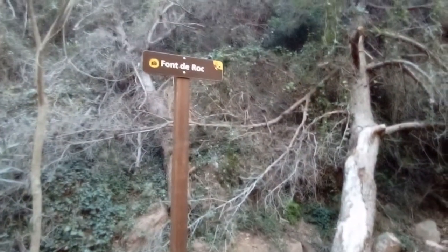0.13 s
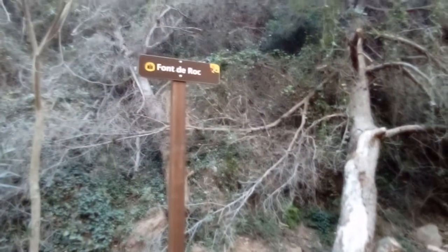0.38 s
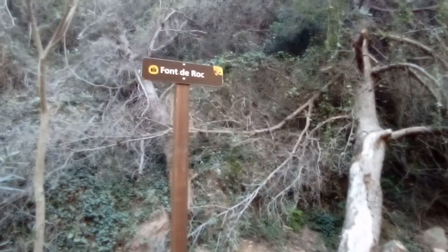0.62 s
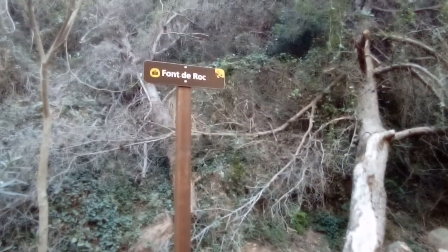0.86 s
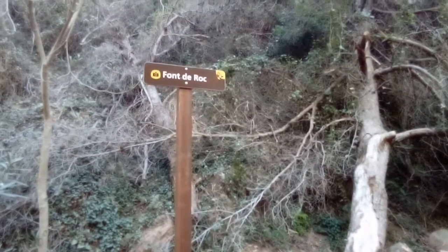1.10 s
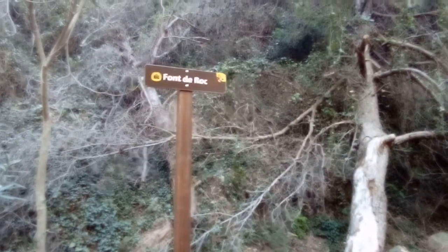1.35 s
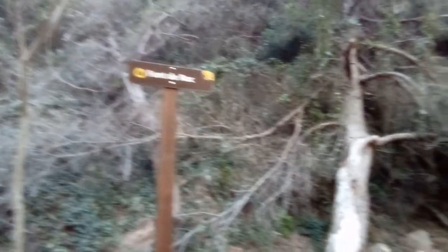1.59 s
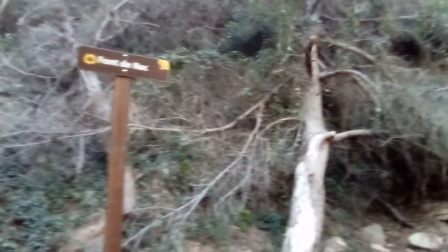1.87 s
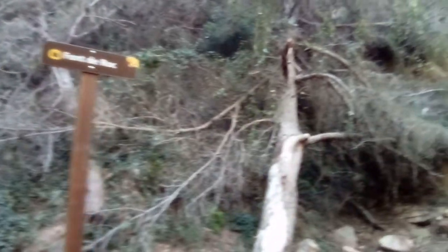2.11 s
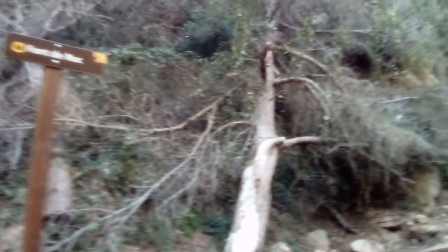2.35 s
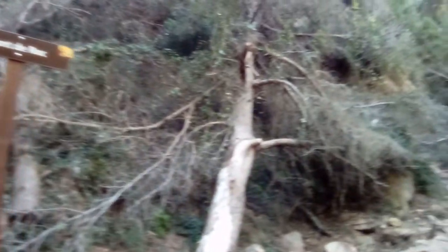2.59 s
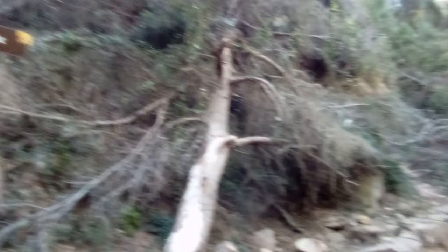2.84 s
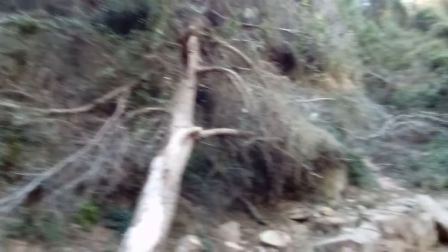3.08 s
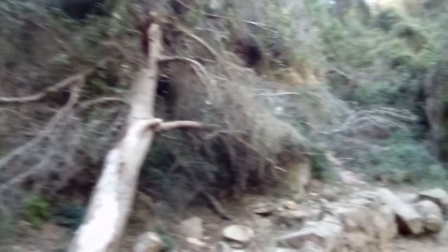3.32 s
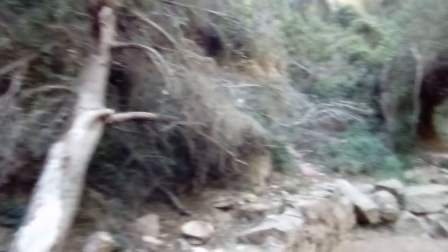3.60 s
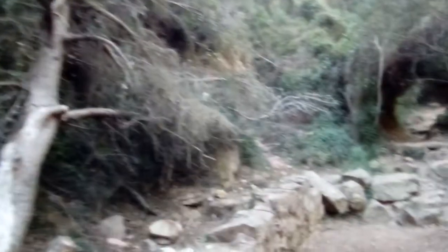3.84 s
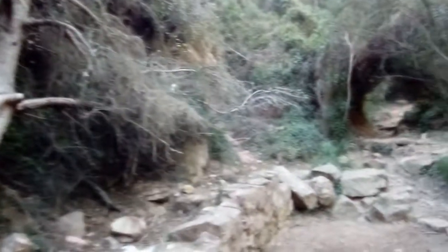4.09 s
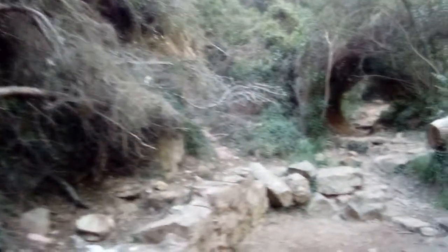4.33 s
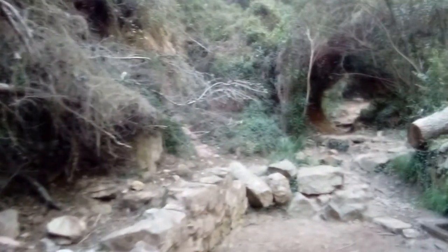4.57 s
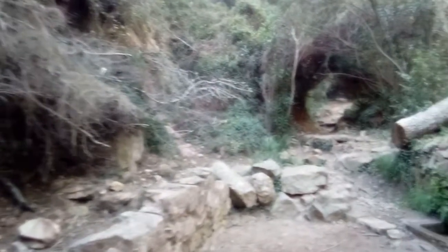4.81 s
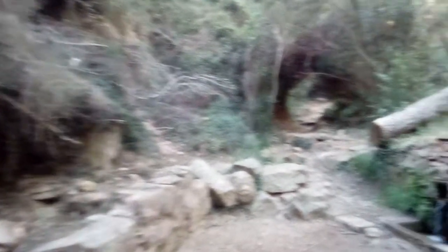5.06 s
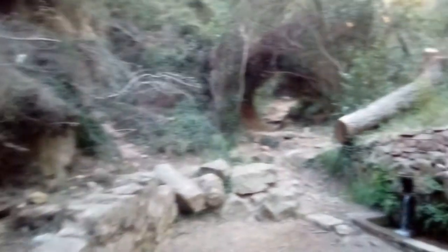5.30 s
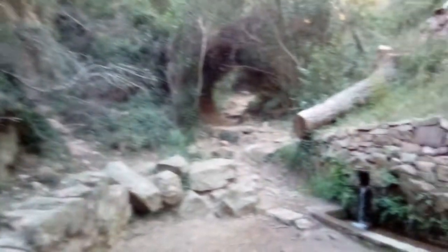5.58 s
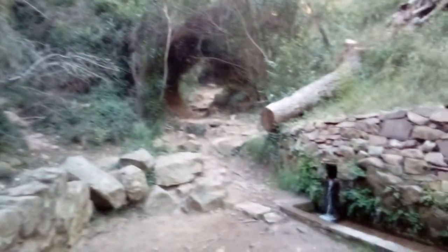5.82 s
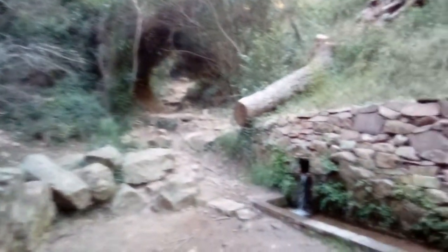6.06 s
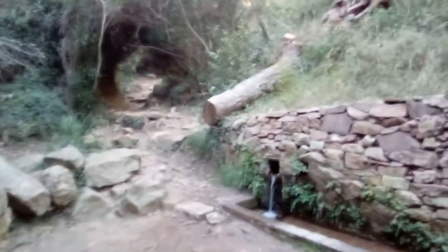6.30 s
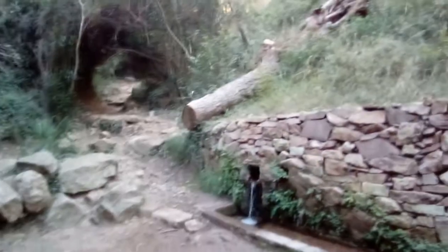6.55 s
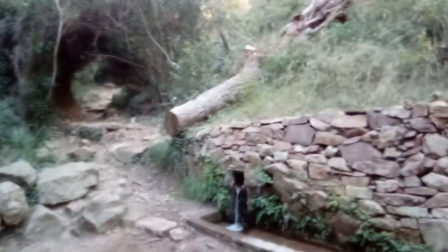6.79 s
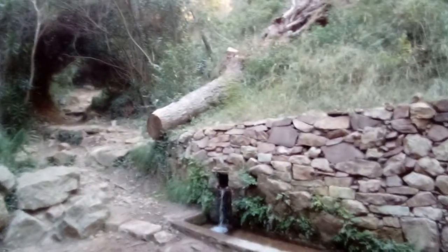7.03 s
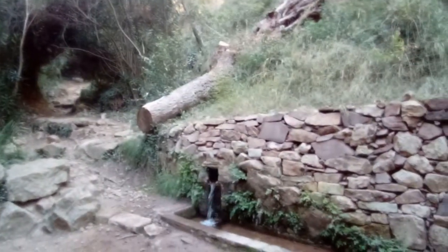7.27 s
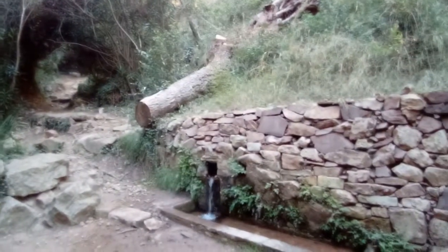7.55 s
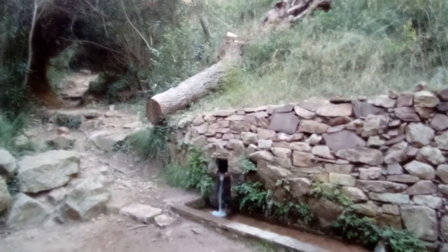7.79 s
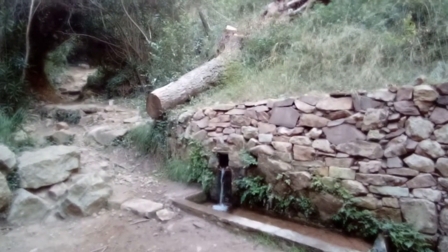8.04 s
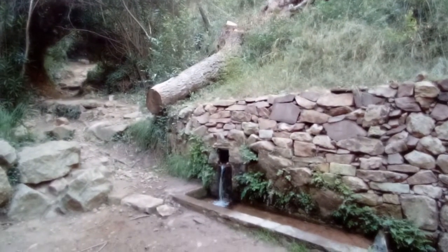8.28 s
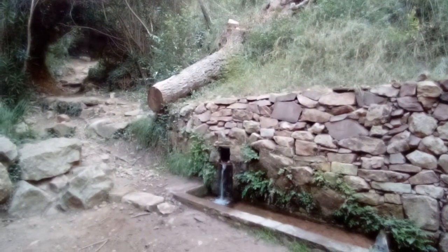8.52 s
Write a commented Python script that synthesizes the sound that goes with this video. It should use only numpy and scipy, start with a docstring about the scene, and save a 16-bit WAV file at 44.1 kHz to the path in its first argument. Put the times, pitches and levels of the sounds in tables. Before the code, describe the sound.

A thin stream of spring water falls without pause into a narrow stone trough outdoors. Splashing spray carries hollow gulps, gurgles and small pops. Shoes scuff dirt near the start, around three to four seconds and at six and a half; a few dry snaps occur. The hand-held stereo microphone slowly turns to the water, so the splash changes colour and bubbles become clearer, with resonant slaps late on.

```python
"""Splashing, gulping water at once: a spring pours from a pipe in a stone wall into a narrow outdoor trough.
Splash is coloured noise in swelling bands; gulps, bloops and pops are rising sines; gurgle is clumped ringing.
Slaps are noise rushes through the resonances of the hollow under the pipe.
Feet shift on the dirt path: scuffs are band-passed grit noise, snaps are short modes.
A hand-held microphone pair turns slowly towards the water, changing colour and lag."""
import sys
import numpy as np
from scipy import signal
from scipy.fft import rfft, irfft
from scipy.io import wavfile
from scipy.ndimage import uniform_filter1d, map_coordinates

SR = 44100
rng = np.random.default_rng(int(sys.argv[2]) if len(sys.argv) > 2 else 0)


def pcm_store(signal):
    """Save signal as 16-bit PCM."""
    levels = np.round(np.clip(np.atleast_2d(signal), -1, 1) * 32767)
    wavfile.write(sys.argv[1], SR, levels.astype(np.int16).T)


def magnitude_from_level(level_db):
    """Linear magnitude for a level in decibels (20 dB per decade)."""
    exponent = np.asarray(level_db, float) / 20
    return 10 ** exponent


N = 381456


def rms_one(x):
    """Scale to rms 1 over all channels."""
    return x / np.sqrt(np.mean(x ** 2) + 1e-20)


def at_hz(points, hz, column=1):
    """Table column interpolated over log frequency."""
    points = np.array(points)
    return np.interp(np.log(np.maximum(hz, 1)), np.log(points[:, 0]), points[:, column])


def drift(rate_hz):
    """Slow chance of rms 1: noise at every 20th sample through a double one-pole low-pass."""
    r = np.exp(-40 * np.pi * rate_hz / SR)
    noise = rng.standard_normal(N // 20 + 2002)
    slow = signal.lfilter([1], [1, -2 * r, r * r], noise)[2000:]
    return np.interp(np.arange(N) / 20, np.arange(len(slow)), rms_one(slow))


def grains(per_s, spread_db):
    """Random clicks, a few of them much larger than the rest."""
    sizes = magnitude_from_level(spread_db * np.minimum(rng.exponential(1, N), 4))
    return sizes * (rng.random(N) < per_s / SR)


def colour(x, db_by_hz):
    """Causal filter with the given gain on an even grid from 0 to SR / 2 (folded cepstrum)."""
    cepstrum = irfft(db_by_hz * np.log(10) / 20)
    half = len(cepstrum) // 2
    cepstrum[1:half] *= 2
    cepstrum[half + 1:] = 0
    return signal.oaconvolve(x, irfft(np.exp(rfft(cepstrum)))[:half])[:N]


def blend(x, position, tables):
    """Three colourings of one sound, at positions 0, 1 and 2, fade into each other."""
    position = np.clip(position, 0, 2)
    return sum(np.clip(1 - abs(position - p), 0, 1) * colour(x, db) for p, db in enumerate(tables))


def add(out, start_s, sound):
    """Mix a sound in, cut at the end of the scene."""
    at = round(start_s * SR)
    out[..., at:at + sound.shape[-1]] += sound[..., :N - at]


def late_left(x, lag_ms):
    """The common sound reaches the left microphone later."""
    left = map_coordinates(x, [np.arange(N) - lag_ms * SR / 1000], order=3)
    return np.array([left, x])


def bubble(db, hz, t60_s, rise_octaves, swell_cycles):
    """A sine that swells, climbs in pitch over the first third of its t60 and dies."""
    t = np.arange(round(t60_s * SR)) / SR
    phase = 2 * np.pi * np.cumsum(hz * 2 ** (rise_octaves * np.minimum(3 * t / t60_s, 1))) / SR
    shape = (1 - np.exp(-t * hz / swell_cycles)) * magnitude_from_level(-60 * t / t60_s)
    return magnitude_from_level(db) * np.sin(phase) * shape / shape.max()


def ring(clicks, hz, t60_s):
    """A unit click sets a decaying sine of height 1 ringing."""
    r, w = magnitude_from_level(-60 / (t60_s * SR)), 2 * np.pi * hz / SR
    return signal.lfilter([0, np.sin(w)], [1, -2 * r * np.cos(w), r * r], clicks + 1e-18)


def droplets(low_hz, high_hz, per_s, cycles, count):
    """Bubbles born in clumps, dealt to pitches spread evenly in Hz; higher ones die sooner; rms 1."""
    born = grains(per_s * magnitude_from_level(4.7 * drift(11.0)), spread_db=8.5)
    dealt = rng.integers(0, count, N)
    out = 0
    for k, hz in enumerate(np.linspace(low_hz, high_hz, count)):
        out = out + ring(born * (dealt == k), hz, cycles / hz ** 0.51) * hz ** 0.87
    return rms_one(out)


def slugs(hz):
    """Each loud bubble comes with a short burst of spray around its own pitch."""
    s, db, pitch_hz = np.transpose(LOUD_POPS)[:3]
    hits = np.zeros(N)
    nearness = np.exp(-(np.log2(pitch_hz / hz) / .75) ** 2)
    hits[np.round(s * SR).astype(int)] = magnitude_from_level(db + 30) * nearness
    fall = magnitude_from_level(-60 / (0.054 * SR))
    return uniform_filter1d(signal.lfilter([1], [1, -fall], hits), round(0.0017 * SR))


def spray(bubbling_db):
    """Three flat-spectrum splashes (common, left only, right only) that swell together."""
    edges_hz = np.minimum(30 * 2 ** np.arange(0, 9.6, .5), 19000)
    white, out = rng.standard_normal((2, 3, N)), 0
    near, flow = drift(25.0), drift(32.0)
    flow -= uniform_filter1d(flow, round(.15 * SR))  # the mean flow is steady
    spit_fall = magnitude_from_level(-60 / (0.0048 * SR))
    spits = signal.lfilter([1], [1, -spit_fall], grains(per_s=70.0, spread_db=3.5))  # brief wide spatters
    for k, (low, high) in enumerate(zip(edges_hz, edges_hz[1:])):
        near = 0.85 * near + 0.6 * drift(36.0)  # neighbouring bands swell partly together
        band_pass = signal.butter(2, [low, high], "band", fs=SR, output="sos")
        band = signal.sosfilt(band_pass, white[k % 2])
        spit_share = .33 * min(low / 1000.0, 1) * (2.4 if low > 10500 else 1)  # finest spray spits hardest
        bursts = 1 + slugs(np.sqrt(low * high)) + spit_share * spits
        swell_db = 0.5 * flow + 1.28 * near + 2.44 * drift(98.0) + 1.44 * drift(2.37)
        out = out + rms_one(band * magnitude_from_level(swell_db) * bursts) * np.sqrt(high - low)  # 0 dB per Hz
    born_per_s = 1500. * (1 + 2.7 * slugs(1600.))  # a slug leaves a cluster of bubbles behind
    out[0] += magnitude_from_level(37 + bubbling_db) * droplets(800., 7000., per_s=born_per_s, cycles=2.2, count=40)
    return out


# Splash spectrum at each microphone before hollow lifts and final gain.
# Each row: frequency in Hz, level in dB per Hz facing away, the same sideways, the same facing the water.
LEFT_SPLASH = [(40, -103, -104, -103), (80, -99, -98, -97), (130, -93, -91, -90), (360, -80, -84, -86),
               (760, -93, -86, -91), (1150, -88, -82, -82), (2000, -82, -80, -77), (3000, -85, -85, -82),
               (4300, -81, -83, -86), (5300, -86, -90, -88), (6600, -91, -94, -91.6),
               (7600, -102, -104, -103), (9300, -109, -103, -101), (14000, -113, -109, -108),
               (14700, -104, -97, -92), (15500, -103, -97, -91)]
RIGHT_SPLASH = [(40, -95, -94, -93), (80, -90, -89, -88), (130, -91, -89, -90), (360, -81, -84, -86),
                (760, -95, -88, -92), (1150, -89, -84, -83), (2000, -84, -80, -75), (3000, -82, -78, -82),
                (4400, -75, -78.6, -74), (5300, -84, -79, -72), (6600, -82, -75, -80),
                (7600, -90, -86, -87), (9300, -100, -93.5, -96), (13900, -102, -92, -99),
                (14650, -88, -79, -81), (15500, -87, -79, -81)]
# Resonances of hollow and trough. Each row: frequency in Hz, width in Hz, lift in dB at opening 0, at 1, at 2.
HOLLOW_MODES = [(250, 37, 9, 14.5, 12.5), (480, 44, -0.5, 2.8, 10), (996, 130, 5.5, 1.1, 7),
                (1250, 18, 0.5, 0.56, 4), (1410, 130, 11.5, 0.23, -3.5), (1500, 37, 2, 0.71, 9),
                (1762, 140, 8, 5.1, 3.5), (1860, 33, 1.5, 0.5, 2), (2037, 64, 0.5, 0.1, 3),
                (2227, 124, 8.5, 10.5, 4.5), (2450, 60, 7.5, 2.7, 9.5), (2640, 73, -7, 8.8, 4)]
# Likeness of the two channels. Each row: frequency in Hz, share of power common to both (held to .01-.99).
COMMON_SHARE = [(50, 0.25), (140, 0.098), (250, 0.74), (600, 0.37), (1200, 0.57), (2200, 0.36),
                (5000, 0.13), (9000, 0.0047)]


def splash(pose, lag_ms, opening):
    """The spray coloured by hollow, trough and the way each microphone points."""
    gain_db = 1.5
    common, *own = spray(bubbling_db=2 * pose)  # bubbles stand out once the trough is in view
    hz = np.linspace(0, SR / 2, 4097)
    share = np.clip(at_hz(COMMON_SHARE, hz), .01, .99)
    flat = late_left(colour(common, 10 * np.log10(share)), lag_ms)
    flat += [colour(x, 10 * np.log10(1 - share)) for x in own]
    lifts_db = [sum(row[2 + p] / (1 + (2 * (hz - row[0]) / row[1]) ** 2) for row in HOLLOW_MODES)
                for p in range(3)]
    out = []
    for x, table in zip(flat, (LEFT_SPLASH, RIGHT_SPLASH)):
        hollowed = blend(x, opening, lifts_db)
        out.append(blend(hollowed, pose, [at_hz(table, hz, column=1 + p) for p in range(3)]))
    return magnitude_from_level(gain_db) * np.array(out)


# Mid-sized bubbles churning in the trough. Each row: time in seconds, rms in dB before the low mix.
GURGLE_LEVEL = [(0, -53.5), (.55, -58.5), (1.0, -80), (1.9, -58), (2.75, -63.5), (3.9, -63), (4.25, -56),
                (5.0, -82), (6, -50.5), (6.4, -64), (7.1, -55.5), (7.6, -58), (8.65, -62)]


def gurgle():
    """Clumped mid-sized bubbles ring at fixed pitches under a moving level."""
    level_db = np.interp(np.arange(N) / SR, *np.transpose(GURGLE_LEVEL))
    return magnitude_from_level(level_db) * droplets(283.0, 680.0, per_s=410.0, cycles=1.0, count=14)


# Loudest air pockets under the stream. Each row: start in seconds, peak in dB before the low mix, pitch in Hz.
LOUD_GULPS = [(0.044, -37, 242), (0.609, -33, 258), (0.709, -29, 248.6), (0.946, -37.5, 239),
              (1.443, -38, 285), (1.657, -36.5, 250), (1.955, -39.5, 260), (2.041, -38.5, 270),
              (2.946, -36.5, 265), (3.02, -33.5, 305), (3.084, -35.5, 248), (4.314, -28, 242),
              (4.439, -39, 252), (4.877, -32, 231), (5.3, -39, 264), (5.396, -35, 250), (5.694, -33, 242),
              (5.842, -35, 260), (6.011, -30.5, 259.5), (6.166, -37.5, 265), (6.504, -33.5, 230),
              (6.66, -32, 231), (6.777, -27, 246), (7.195, -32.5, 228), (7.281, -36.5, 282),
              (8.244, -28, 242.5), (8.378, -32, 227)]


def gulps():
    """Air pockets ring near the lowest resonance; weaker ones come at random between the loud ones."""
    t60_at_250hz_s, t60_fall_power, shortest_s = 0.087, 3.1, 0.078  # larger, lower pockets ring longer
    out = np.zeros(N)
    for s, db, hz in LOUD_GULPS:
        t60_s = max(t60_at_250hz_s * (250 / hz) ** t60_fall_power, shortest_s)
        add(out, s, bubble(db, hz, t60_s, rise_octaves=0.098, swell_cycles=0.65))
        later, apart = rng.random(2)  # the pocket splits: a weaker one follows at another pitch
        second = bubble(db - 15.5, hz * (.92 + 0.232 * apart), 1.2 * t60_s, rise_octaves=0.12, swell_cycles=2.8)
        add(out, s + .02 + 0.0305 * later, second)
    for when, size, pitch, length in rng.random((420, 4)):
        db, hz, t60_s = -53 + 13 * size ** 4.0, 222 + 140 * pitch ** 1.8, 0.038 + 0.12 * length ** 2
        add(out, when * N / SR, bubble(db, hz, t60_s, rise_octaves=0.25 * pitch, swell_cycles=0.93))
    return out


# Soles scuffing and treading on dirt.
# Each row: start in seconds, rms in dB before shaping, length in seconds before the tail, bottom Hz, top Hz.
SOLE_SCUFFS = [(0.141, -46.5, 0.045, 250, 1020), (0.19, -31.5, 0.061, 158, 1190),
               (3.097, -62, 0.17, 30, 151), (3.159, -35, 0.047, 294, 910), (4.063, -47, 0.062, 300, 1060),
               (4.206, -48.5, 0.13, 252, 634), (4.303, -54, 0.073, 30.4, 150),
               (6.515, -38, 0.044, 272, 930)]


def crunch_shape(length_s):
    """Quick squared rise, hold, softer tail."""
    rise_share, tail_s = 0.39, 0.093
    t = np.arange(round((length_s + tail_s) * SR)) / SR
    rise = np.minimum(t / (rise_share * length_s), 1) ** 2
    return rise * magnitude_from_level(-60 * np.maximum(t - length_s, 0) / tail_s)


def scuffs():
    """Grit crunches in dull bursts: band-passed noise, uneven as stones give way one by one."""
    out = np.zeros((2, N))
    stones = uniform_filter1d(grains(per_s=320.0, spread_db=3.5), round(0.0022 * SR))
    grit = rng.standard_normal((3, N)) * (0.41 + stones * 30)
    grit = grit[0] + .5 * grit[1:]
    for s, db, length_s, low_hz, top_hz in SOLE_SCUFFS:
        at, shape = round(s * SR), crunch_shape(length_s)
        dull = signal.butter(3, [low_hz, top_hz], "band", fs=SR, output="sos")
        crunch = rms_one(signal.sosfilt(dull, grit[:, at:at + len(shape)]))
        side_gain = magnitude_from_level([[-6.0], [3.0]] if top_hz < 200 else 0)  # dull treads thud more on the right
        add(out, s, magnitude_from_level(db) * crunch * shape * side_gain)
    return out


# Loudest small bubbles. Each row: time in seconds, cluster level in dB, pitch in Hz, left minus right in dB.
LOUD_POPS = [(0.65, -29, 2180, 6), (0.749, -26, 4330, 0), (1.06, -34.5, 2300, 3), (1.7198, -22, 2260, 5),
             (1.894, -39, 2270, 2), (2.105, -30.5, 2200, 0), (2.21, -34, 1780, 9), (3.069, -26, 2830, -24),
             (3.424, -28.5, 2540, -17), (3.913, -28, 2070, -4), (4.145, -29, 2140, -10),
             (4.244, -23, 2130, -5), (4.317, -28.5, 2590, -13), (4.586, -28, 2150, -14),
             (4.739, -25.5, 2640, -6.0), (5.107, -28, 2450, -10), (5.385, -33, 1040, 4),
             (5.622, -27, 5700, -8), (5.75, -27.5, 2370, -26), (6.057, -28, 5030, -20),
             (6.091, -22.5, 5130, -7), (6.484, -24.5, 2480, 4), (6.531, -24, 2290, -2.5),
             (6.975, -23, 5070, -28), (7.364, -30.5, 1040, 0), (7.498, -32, 1860, -2.0),
             (7.675, -25.5, 1250, 11), (7.753, -30, 1860, -4.5), (7.831, -26.5, 920, 2),
             (8.142, -25, 1860, 3), (8.196, -26.5, 1750, 4), (8.408, -26.5, 2380, -8),
             (8.483, -23.5, 1860, -3), (8.518, -23, 2350, 0)]


def pops(lag_ms):
    """Each pop is a small cluster: one bubble and weaker neighbours scattered in pitch just after it."""
    left, right = np.zeros((2, N))
    scatter = rng.uniform(-0.1814, 1, (len(LOUD_POPS), 4, 2))
    for (s, db, hz, pan_db), cluster in zip(LOUD_POPS, scatter):
        sound = np.zeros(round(.08 * SR))
        add(sound, 0, bubble(db - 6, hz, 2.6 / hz ** .6, rise_octaves=.05, swell_cycles=3))
        for apart, later in cluster:
            near_hz = hz * 2 ** (.6 * apart)
            near = bubble(db - 15.5, near_hz, 1.3 / near_hz ** 0.62, rise_octaves=0.042, swell_cycles=2.3)
            add(sound, 0.019 * later ** 2, near)
        add(left, s - .0015, sound * 2 / (1 + magnitude_from_level(-pan_db)))
        add(right, s - .0015, sound * 2 / (1 + magnitude_from_level(pan_db)))
    return np.array([late_left(left, lag_ms)[0], right])


# Dry snaps underfoot.
# Each row: start in seconds, level in dB, added left minus right in dB, tilt in dB per two octaves from 500 Hz.
DRY_SNAPS = [(2.563, -13.5, -2, -33), (5.8895, -10.5, 9.5, -1.7), (6.008, -20, 8, -4.5)]
# Modes of a snap. Each row: frequency in Hz, left gain in dB, right gain in dB, t60 in seconds.
TWIG_MODES = [(590, 3.5, 1, 0.0069), (1370, -26, 9, 0.0051), (2090, 18.5, -32, 0.001),
              (3830, -21, 8, 0.0067), (6300, -7.5, -2, 0.0034), (9800, -29, -9, 0.0022),
              (15000, -27, 9, 0.0033)]


def snaps():
    """A twig or pebble snaps with a few short modes, slightly later on the left."""
    out = np.zeros((2, N))
    t = np.arange(round(.03 * SR)) / SR
    for s, db, pan_db, tilt_db in DRY_SNAPS:
        for k, (hz, left_db, right_db, t60_s) in enumerate(TWIG_MODES):
            level_db = db + tilt_db * np.log2(hz / 500) / 2 - 60 * t / t60_s
            mode = (-1) ** k * magnitude_from_level(level_db) * np.sin(2 * np.pi * hz * t)
            mode *= 1 - np.exp(-t * hz / 0.58)
            add(out[0], s + 0.00037, mode * magnitude_from_level(left_db + pan_db / 2))
            add(out[1], s, mode * magnitude_from_level(right_db - pan_db / 2))
    return out


# Longer, lower bubbles that slide up.
# Each row: start in seconds, peak in dB before the low mix, pitch in Hz, t60 in seconds, rise in octaves.
SLIDING_BLOOPS = [(4.642, -35, 564, 0.074, 0.55), (5.44, -37, 420, 0.066, 0.76),
                  (5.58, -37.5, 392, 0.032, 0.088), (6.538, -30, 332, 0.074, 0.14),
                  (6.691, -39, 460, 0.11, 0.05), (8.07, -36, 480, 0.22, 0.057)]


def bloops():
    """Single low bubbles slide up in pitch as they die."""
    out = np.zeros(N)
    for s, db, hz, t60_s, rise_octaves in SLIDING_BLOOPS:
        add(out, s, bubble(db, hz, t60_s, rise_octaves, swell_cycles=1.4))
    return out


def ring_moving(drive, hz, t60_s):
    """A resonance applied twice (steep skirts) whose pitch changes from sample to sample."""
    turn, r = np.exp(2j * np.pi * np.cumsum(hz) / SR), magnitude_from_level(-60 / (t60_s * SR))
    return np.imag(signal.lfilter([1 - r], [1, -2 * r, r * r], drive / turn + 1e-18) * turn)


# Heaviest slugs slapping into the trough. Each row: time in seconds, mean drive in dB into the resonances.
HEAVY_SLAPS = [(5.38, -47), (5.44, -41), (5.581, -40), (6.167, -45), (6.595, -31.5), (6.727, -44),
               (6.77, -36), (6.92, -38), (7.328, -34), (7.477, -44), (7.498, -30.5), (7.574, -35),
               (7.671, -33), (7.69, -57), (7.796, -31), (7.831, -35), (7.865, -41), (7.923, -48),
               (7.97, -48), (8.318, -44), (8.371, -48), (8.533, -32.5)]


def slaps(opening):
    """A dying rush of water rings the upper resonances of the hollow at once, each with its own strength."""
    swell_s, rush_t60_s, ring_at_1khz_s = 0.012, 0.049, 0.027
    wander_share, wander_hz = 0.03, 7.3  # the heaving surface shifts the resonances by this share of pitch
    small = grains(per_s=70.0, spread_db=2.3) * magnitude_from_level(-51 + 8 * (opening - 2))
    times_s, heavy_db = np.transpose(HEAVY_SLAPS)
    at, out = np.round(times_s * SR).astype(int), 0
    luck = rng.standard_normal((len(HEAVY_SLAPS), len(HOLLOW_MODES)))
    for k, (hz, _, _, _, lift_db) in enumerate(HOLLOW_MODES[1:]):
        reached = rng.random(N) < .6  # a small slap reaches only some resonances
        hits = small * magnitude_from_level(1.9 * rng.standard_normal(N)) * reached
        hits[at] = magnitude_from_level(heavy_db + 3.6 * luck[:, k])
        rush = signal.lfilter([1], [1, -magnitude_from_level(-60 / (rush_t60_s * SR))], hits + 1e-18)
        rush = uniform_filter1d(rush, round(swell_s * SR)) * rng.standard_normal(N)
        moving_hz = hz * (1 + wander_share * drift(wander_hz))
        gain_db = 0.86 * min(lift_db, 9.0) - 26.0 - (4.0 if hz < 600 else 0)
        out = out + magnitude_from_level(gain_db) * ring_moving(rush, moving_hz, ring_at_1khz_s * (1000 / hz) ** 0.81)
    return out


# The turn of the pair. Each row: time in seconds, pose (0 away, 1 sideways, 2 facing the water),
# lag of the left microphone in ms, opening of the hollow to the listener (its splash lifts stop growing at 2).
MICROPHONE_TURN = [(0, 0.032, 0.41, 0.025), (1.3, 0.0073, 0.42, 0.033), (2.2, 0.53, 0.46, 0.56),
                   (3.2, 0.75, 0.4, 0.71), (4.2, 0.98, 0.35, 1.06), (4.7, 1.1, 0.34, 1.5),
                   (5.2, 1, 0.33, 2.66), (5.8, 1.1, 0.13, 2.74), (6.2, 1.74, 0.085, 2.5),
                   (7.0, 1.9, 0.061, 2.6), (8.65, 1.78, 0.069, 2.6)]


def scene():
    """All water layers and the feet, as the pair of microphones turns."""
    s, *columns = np.transpose(MICROPHONE_TURN)
    pose, lag_ms, opening = (np.interp(np.arange(N) / SR, s, c) for c in columns)
    low = gurgle() + gulps() + bloops() + slaps(opening)
    low = signal.sosfilt(signal.butter(2, 110., "high", fs=SR, output="sos"), low)
    low = late_left(low, lag_ms) * magnitude_from_level([[.4], [-.4]])  # dB left, right
    return splash(pose, lag_ms, opening) + low + scuffs() + pops(lag_ms) + snaps()


def roll_off(x):
    """The treble ends steeply here."""
    return signal.sosfilt(signal.butter(12, 16830, fs=SR, output="sos"), x)


def record(dry):
    """The top is cut steeply above 15.55 kHz."""
    mix = signal.sosfilt(signal.ellip(10, .3, 50, 15550, fs=SR, output="sos"), dry)
    return roll_off(mix)


dry = scene()
out = record(dry)
pcm_store(out)
```